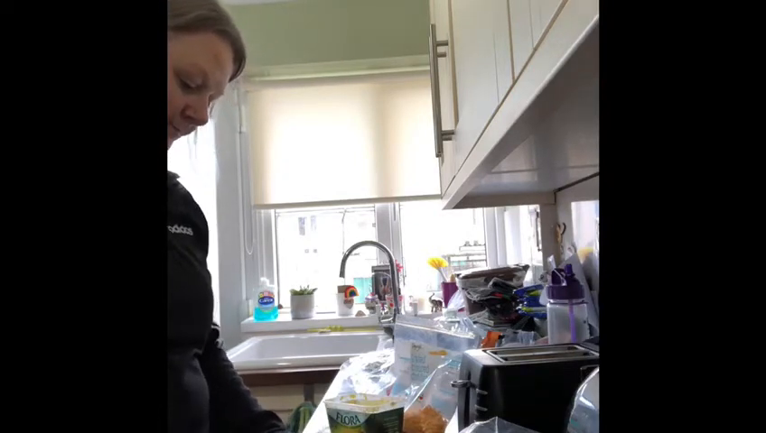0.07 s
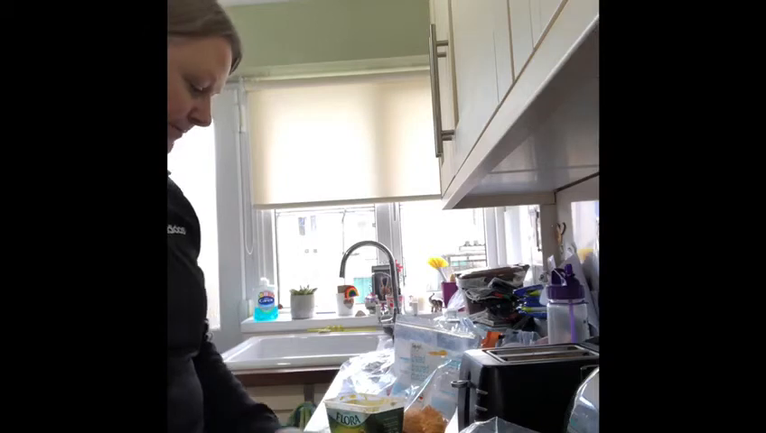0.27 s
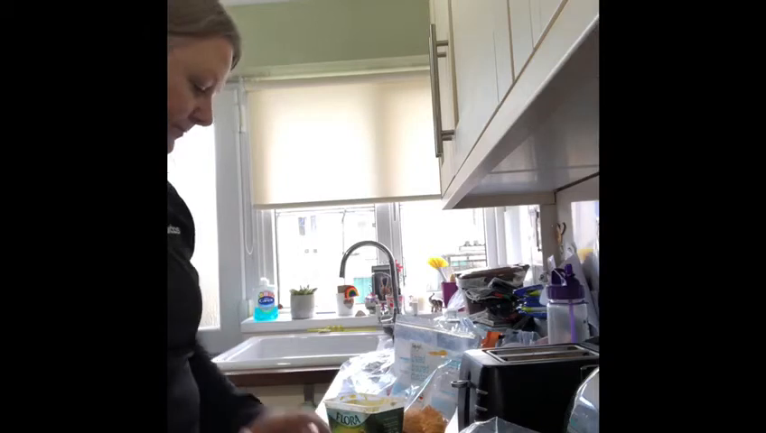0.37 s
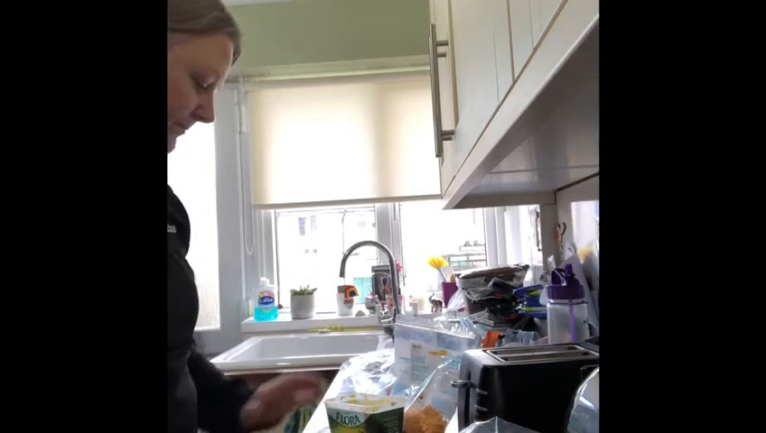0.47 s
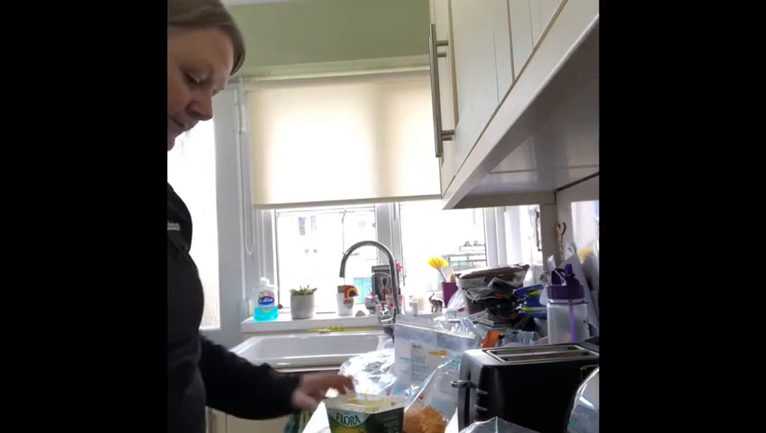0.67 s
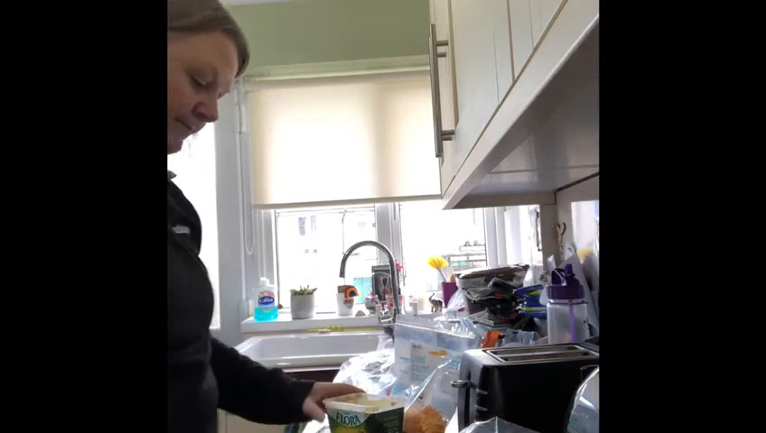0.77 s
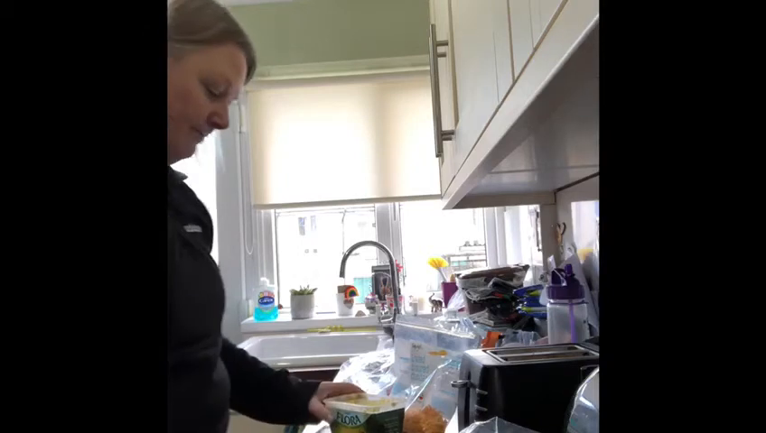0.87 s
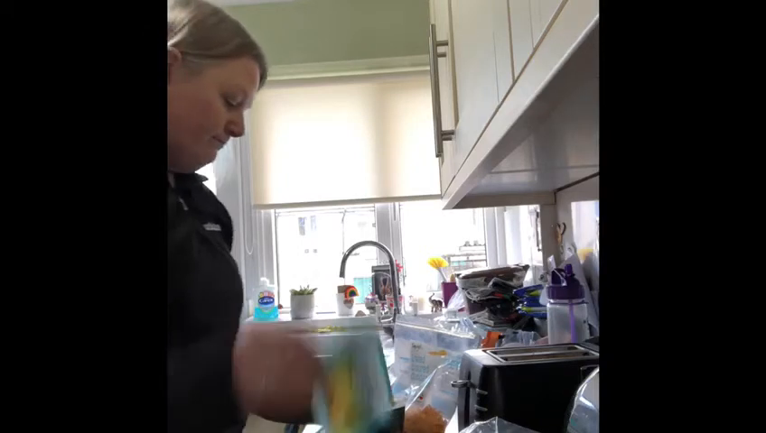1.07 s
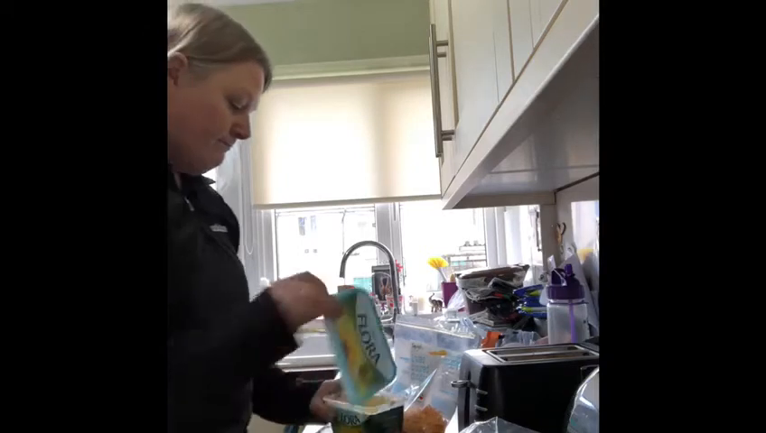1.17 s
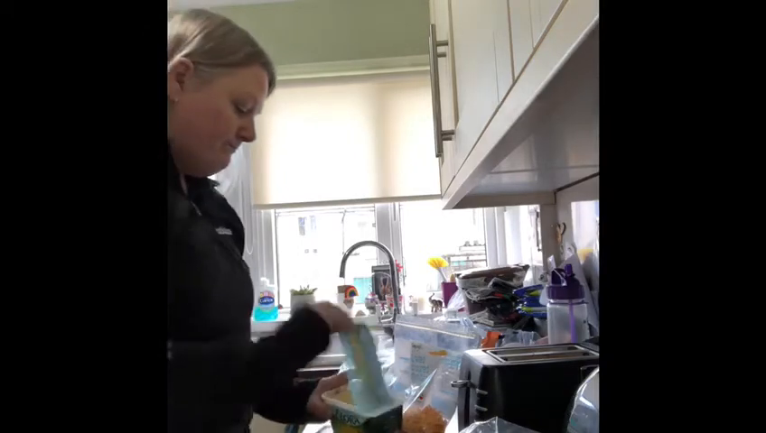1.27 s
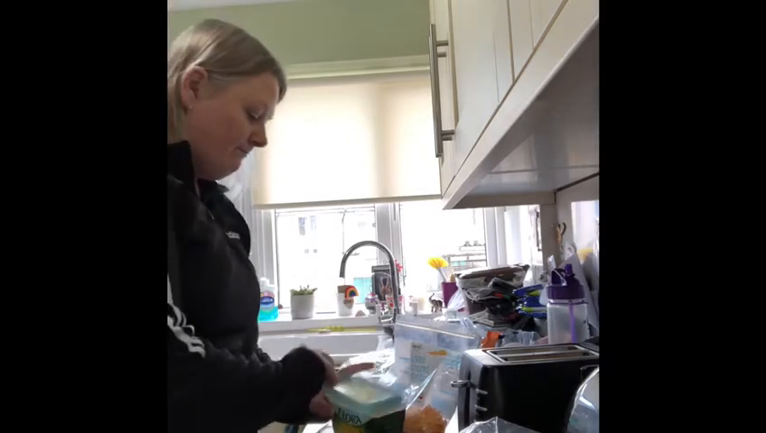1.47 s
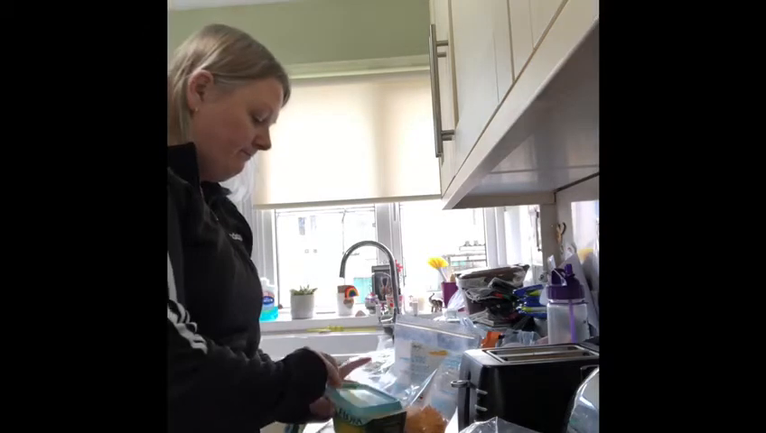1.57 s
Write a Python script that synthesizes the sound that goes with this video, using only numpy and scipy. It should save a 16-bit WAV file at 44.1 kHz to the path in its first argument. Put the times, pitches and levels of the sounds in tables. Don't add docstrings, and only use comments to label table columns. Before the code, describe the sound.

A steel knife clatters onto a counter, then scrapes dry toast, with one sharp plastic knock

```python
import sys
import numpy as np
from scipy import signal
from scipy.fft import rfft, irfft
from scipy.io import wavfile
from scipy.ndimage import uniform_filter1d

SR = 44100
rng = np.random.default_rng(int(sys.argv[2]) if len(sys.argv) > 2 else 0)


def volts_from_db(level):
    exponent = np.asarray(level, float) / 20
    return 10 ** exponent


def dump(signal):
    limited = np.clip(np.atleast_2d(signal).T, -1, 1)
    pcm = np.round(limited * 32767).astype(np.int16)
    wavfile.write(sys.argv[1], SR, pcm)


N = 74970
TIME_S = np.arange(N) / SR
BODY, CRUMBS = 3, 4


def unit(x):
    return x / np.sqrt(np.mean(x ** 2))


def colour(x, points):
    hz, db = np.array(points).T
    size = 4096
    bins_hz = np.arange(size // 2 + 1) * SR / size
    log_gain = np.interp(np.log(bins_hz + 1), np.log(hz), db) * np.log(10) / 20
    cepstrum = irfft(log_gain)
    folded = np.concatenate([cepstrum[:1], 2 * cepstrum[1:size // 2], np.zeros(size // 2)])
    impulse = irfft(np.exp(rfft(folded)))[:size // 2]
    return signal.fftconvolve(x, impulse)[:N]


def hit(start_s):
    return (np.arange(N) == int(start_s * SR)) * 1.0


def ring(x, hz, t60_s):
    pole = np.exp(2j * np.pi * hz / SR - np.log(1000) / (t60_s * SR))
    return signal.lfilter([1], [1, -pole], x).imag


def band(x, hz, width_hz):
    return signal.lfilter(*signal.iirpeak(hz, hz / width_hz, SR), x)


def sliding(x, hz, width_hz):
    turn = np.exp(2j * np.pi * np.cumsum(hz) / SR)
    keep = np.exp(-np.pi * width_hz / SR)
    return 2 * (turn * signal.lfilter([1 - keep], [1, -keep], x / turn)).real


def walk(rate_hz):
    k = int(SR / rate_hz)
    return unit(uniform_filter1d(uniform_filter1d(rng.standard_normal(N), k), k))


def grit(grain_db, grain_s):
    k = max(int(grain_s * SR), 1)
    grain_gain = volts_from_db(grain_db * rng.exponential(size=N)[:N // k + 1])
    size = np.repeat(grain_gain, k)[:N]
    return unit(uniform_filter1d(size, k) * rng.standard_normal(N))


def pressure(curve):
    time_s, level_db = np.array(curve).T
    return volts_from_db(np.interp(TIME_S, time_s, level_db, left=-200, right=-200))


def contacts(rows, column):
    push = np.zeros(N)
    for row in rows:
        peak_s, rise_s, fall_s = row[:3]
        slope_s = np.where(TIME_S < peak_s, rise_s, fall_s)
        push += volts_from_db(row[column]) * np.exp(-np.abs(TIME_S - peak_s) / slope_s)
    return push


def scrape(push, points, peaks, grain_db, grain_s, peak_db, bend=1.0):
    travel = np.interp(TIME_S, (0.87, 1.13), [0, 1])
    tracks = []
    for hz, width_hz, db, *end_hz in peaks:
        slide_hz = end_hz[0] - hz if end_hz else 0
        patchy_db = 3.5 * walk(25)
        tracks.append((bend * (hz + travel * slide_hz), width_hz, volts_from_db(peak_db + db + patchy_db)))

    def body(x):
        y = colour(x, points)
        return y + sum(gain * sliding(y, hz, width_hz) for hz, width_hz, gain in tracks)

    x = grit(grain_db, grain_s)
    steady_rms = np.sqrt(np.mean(body(x) ** 2))
    return body(x * push) / steady_rms


# pitch_hz, density_db (per Hz)
HUM_COLOUR = [(15, -21), (25, -17.5), (246, -6.5), (288, -9.5), (697, -13), (1640, -21.5), (1970, -19.5),
              (2130, -19.5), (12500, -33), (16200, -69), (22000, -120)]


def hum():
    fading = volts_from_db(-66.5 - 60 * TIME_S / 0.22)
    return unit(colour(rng.standard_normal(N), HUM_COLOUR)) * (volts_from_db(-67.5) + fading)


# start_s, level_db, pitch_hz
CLINKS = [
    (0, -74.5, 6000),
    (.158, -72, 1920),
    (0.158, -72.5, 3020),
]


def clinks():
    t60_s = 0.27
    return sum(volts_from_db(db) * ring(hit(s), hz, t60_s) for s, db, hz in CLINKS)


# pitch_hz, level_db, t60_s
KNIFE_MODES = [(424.3, -8.5, 0.1), (952, -6, 0.13), (1457, -11.5, 0.096), (2027, -9, 0.045),
               (2407, 0.5, 0.045), (3103, 0.5, 0.11), (4076, 2, 0.055), (4470, -2.5, 0.23),
               (5984, -0.5, 0.2), (7120, -5.5, 0.13), (7610, -4.5, 0.24), (8580, -12.5, 0.22),
               (9390, -7.5, 0.16), (11410, -5.5, 0.082)]
# start_s, level_db, chatter_s
BOUNCES = [
    (0.237, -30.5, 0.03),
    (0.2482, -3, 0.0058),
    (0.2546, -11.5, 0.0057),
    (0.262, -10, 0.0052),
    (0.2658, -9.5, 0.0042),
    (0.2727, -12, 0.0048),
    (0.2766, -12.5, 0.0048),
    (.284, -17, 0.011),
    (0.298, -25.5, 0.028),
]
# pitch_hz, density_db (per Hz)
COUNTER_COLOUR = [(24, -52), (40, -10.5), (412, -8.5), (576, -5), (932, -3), (2750, -6.5), (3100, -3.5),
                  (9150, -17), (12500, -25), (16200, -51), (22000, -120)]


def knife():
    push = sum(volts_from_db(db) * (TIME_S >= s) * np.exp(-np.abs(TIME_S - s) / chatter_s)
               for s, db, chatter_s in BOUNCES)
    landing_s = BOUNCES[1][0]
    strike = grit(1.6, 0.0005) * push * (TIME_S >= landing_s)
    lying = np.clip((TIME_S - 0.298) / 0.0012, 0, 1)
    twin_split, twin_db = 0.012, -5
    blade = np.zeros(N)
    for hz, db, t60_s in KNIFE_MODES:
        flutter_db = 4.5 * walk(90)
        pair = ring(strike, hz, t60_s) + volts_from_db(twin_db) * ring(strike, hz * (1 + twin_split), t60_s)
        blade += volts_from_db(db + lying * (-7.5 + flutter_db)) * pair
    counter = scrape(push, COUNTER_COLOUR, [], 0.77, 0.00077, 0)
    return blade * volts_from_db(-43), counter * volts_from_db(-15)


# time_s, level_db
BRUSH = [
    (.615, -76),
    (.642, -55.5),
    (.71, -73.5),
]
# pitch_hz, density_db (per Hz)
BRUSH_COLOUR = [(180, -39), (300, -14), (1050, -11), (4000, -12), (10900, -23), (12500, -43), (16200, -44),
                (22000, -120)]


def brush():
    return scrape(pressure(BRUSH), BRUSH_COLOUR, [], 1.7, 0.001, 0)


# start_s, crack_db, ring_hz, ring_db
TICKS = [(0.7144, -40, 2950, -60), (0.725, -42, 2470, -64), (0.7336, -25, 1392, -28),
         (0.745, -28, 2200, -37), (0.7627, -40, 1510, -47), (0.7775, -31, 2140, -36),
         (0.7904, -36, 1250, -49), (0.8045, -24.5, 1303, -29.5), (.8203, -38, 2130, -35),
         (1.2249, -24.5, 3810, -26.5), (1.241, -17.5, 4815, -26), (1.3135, -50, 1030, -37.5),
         (1.3623, -43.5, 1270, -38.5), (1.4148, -56, 4790, -34.5), (1.4381, -44, 1710, -39.5),
         (1.4445, -45, 920, -40), (1.6574, -29.5, 1230, -41)]
# start_s, level_db, pitch_hz
THUDS = [
    (0.716, -43.5, 205),
    (0.743, -48, 159),
    (0.784, -46, 166),
    (1.229, -55, 146),
    (1.33, -52, 109),
    (1.369, -45.5, 159),
]


def ticks():
    crack_s, ring_t60_s, thud_t60_s = 0.00081, 0.025, 0.096
    noise = rng.standard_normal(N)
    cracks, rings = np.zeros(N), np.zeros(N)
    for s, crack_db, hz, ring_db in TICKS:
        burst = noise * (TIME_S >= s) * np.exp(-np.abs(TIME_S - s) / crack_s)
        cracks += volts_from_db(crack_db) * (2 * hit(s) + burst)
        rings += volts_from_db(ring_db) * ring(hit(s), hz, ring_t60_s)
    for s, db, hz in THUDS:
        rings += volts_from_db(db) * band(ring(hit(s), hz, thud_t60_s), hz, 150)
    return rings, volts_from_db(-1) * band(cracks, 5500, 6300)


# peak_s, rise_s, fall_s, body_db, crumb_db
RATTLE = [
    (.718, 0.0029, 0.0071, -53, -62),
    (.735, 0.0022, 0.004, -30.5, -44),
    (.746, 0.0053, 0.023, -42, -55),
    (.762, 0.0047, 0.048, -48.5, -54),
    (.779, 0.0042, 0.0089, -59, -58),
    (.806, 0.0045, 0.0066, -39, -45),
    (.821, 0.000977, 0.061, -62, -51.5),
]
# pitch_hz, density_db (per Hz)
RATTLE_COLOUR = [(24, -28), (40, 1), (85, -6), (176, -2), (248, -7.5), (426, -11), (1150, -6),
                 (3000, -14.5), (3900, -31), (6600, -120)]
# pitch_hz, width_hz, level_db
RATTLE_PEAKS = [(1245, 77, -1), (1460, 130, -1.1), (2080, 220, 0.29)]


def rattle():
    return volts_from_db(-2.5) * scrape(contacts(RATTLE, BODY), RATTLE_COLOUR, RATTLE_PEAKS, 2.0, 0.0017, 7.3)


# peak_s, rise_s, fall_s, body_db, crumb_db
SHORT = [(1.352, 0.003585, 0.011, -73, -52), (1.363, 0.0005, 0.013, -47.5, -49),
         (1.39, 0.024, 0.0095, -47, -68.5), (1.416, 0.008, 0.0051, -48.5, -42.5),
         (1.424, 0.0032, .006, -43, -51), (1.439, 0.00051, 0.02, -41, -45.5),
         (1.475, 0.014, 0.019, -50.5, -57.5), (1.527, 0.0013, .008, -51, -55.5),
         (1.539, 0.0073, 0.012, -41, -56.5), (1.558, 0.0055, 0.0053, -45.5, -43),
         (1.565, 0.0033, 0.0063, -38.5, -47), (1.576, 0.0038, 0.013, -43.5, -46.5),
         (1.615, 0.026, 0.031, -46.5, -60), (1.652, 0.0046, .004, -49, -51.5),
         (1.658, 0.0014, 0.0079, -55, -41.5)]
# pitch_hz, density_db (per Hz)
CRUMB_COLOUR = [(1060, 6), (1800, 15), (3390, 16), (4690, 14), (5690, 15), (10800, 7), (12500, -27),
                (16200, -83), (22000, -120)]
# pitch_hz, width_hz, level_db
CRUMB_PEAKS = [(3890, 210, -13), (4710, 530, -9), (5740, 1100, -10.5)]


def crumbs():
    broken = scrape(contacts(RATTLE, CRUMBS), CRUMB_COLOUR, [], 1.1, 0.0013, 0)
    ground = scrape(contacts(SHORT, CRUMBS), CRUMB_COLOUR, CRUMB_PEAKS, 1.8, 0.0008, 9.5)
    return broken + ground


# time_s, level_db
STROKE = [
    (.82, -83),
    (.87, -51),
    (.93, -46.5),
    (1.0, -43.5),
    (1.06, -45),
    (1.11, -50.5),
    (1.16, -57.5),
    (1.21, -85),
    (1.23, -68),
]
# pitch_hz, density_db (per Hz)
STROKE_COLOUR = [(120, -11), (300, -12), (1200, -6.5), (5350, -5.5), (9700, -8.5), (10200, -21),
                 (10900, -16), (11500, -23)]
# start_hz, width_hz, level_db, end_hz
STROKE_PEAKS = [(371, 74, 7, 540), (1160, 60, 4.5, 1233), (2290, 70, -2, 2410), (3000, 75, 0, 3050),
                (3600, 120, 2.5, 3500), (3860, 110, 0, 3950), (4450, 270, 0, 4880), (5150, 300, 0, 5480),
                (7300, 64, -4, 7650), (8470, 81, -13.5, 8420), (9750, 92, -6, 16000)]


def long_stroke():
    return scrape(pressure(STROKE), STROKE_COLOUR, STROKE_PEAKS, 0.98, 0.00047, 9)


# peak_s, rise_s, fall_s, body_db, crumb_db
KNOCK = [
    (1.2245, 0.00041, 0.013, -30.5, -29),
    (1.232, 0.0019, 0.0093, -38.5, -35),
    (1.2425, 0.0011, 0.0038, -71, -24),
    (1.25, 0.0038, 0.033, -58.5, -43.5),
    (1.314, 0.00081, 0.0079, -49, -48.5),
    (1.333, 0.005, 0.018, -58, -70),
]
# pitch_hz, density_db (per Hz)
KNOCK_COLOUR = [(40, -39), (130, 1.5), (530, -2), (1300, -6.5), (1820, -8), (2300, -14), (5000, -56)]
# pitch_hz, width_hz, level_db
KNOCK_PEAKS = [(533, 14, 0), (1790, 130, -0.8)]
# pitch_hz, width_hz, level_db
KNOCK_BRIGHT = [(3650, 770, -8.5), (4500, 560, 16), (5630, 950, 14.5), (7300, 1230, 5.5)]


def knock():
    hollow = scrape(contacts(KNOCK, BODY), KNOCK_COLOUR, KNOCK_PEAKS, 2.0, 0.001, 8.5)
    bright = scrape(contacts(KNOCK, CRUMBS), CRUMB_COLOUR, KNOCK_BRIGHT, 1.3, 0.00092, 21)
    return hollow * volts_from_db(-5.5) + bright * volts_from_db(-4.5)


# pitch_hz, density_db (per Hz)
TUB_COLOUR = [(29, -100), (90, -21), (400, -6), (721, -6), (952, 1), (1410, -13), (2500, -23), (3250, -27),
              (5500, -82)]
# pitch_hz, width_hz, level_db
TUB_PEAKS = [(525, 40, 0), (690, 60, 0.5), (934, 140, -4), (1211, 55, -5.5), (1750, 120, -1.5),
             (2920, 300, 6)]
# time_s, pitch_factor
FLEX = [
    (1.35, 1.12),
    (1.40, 0.92),
    (1.44, 1.13),
    (1.48, .97),
    (1.53, 0.99),
    (1.58, 0.947),
    (1.63, .97),
    (1.68, 0.94),
]


def tub_rub():
    bend = np.interp(TIME_S, *np.array(FLEX).T)
    return scrape(contacts(SHORT, BODY), TUB_COLOUR, TUB_PEAKS, 2.0, 0.0015, 4.9, bend=bend)


def room(x):
    t = np.arange(SR) / SR
    noise = rng.standard_normal(len(t))
    low = signal.lfilter(*signal.butter(1, 2060, fs=SR), noise)
    low_decay = volts_from_db(-60 * t / 0.36)
    high_decay = volts_from_db(-60 * t / 0.13) + volts_from_db(-15 - 60 * t / 0.66)
    tail = low * low_decay + (noise - low) * high_decay
    tail = tail * (t > 0.004)
    return signal.fftconvolve(x, tail / np.sqrt(np.sum(tail ** 2)))[:N] * volts_from_db(-8.5)


def scene():
    blade, counter = knife()
    rings, cracks = ticks()
    rubbing = brush() + long_stroke() + rattle() + knock() + tub_rub() + crumbs()
    noisy = counter + cracks + rubbing
    ringing = blade + rings + clinks()
    echoes = room(noisy + volts_from_db(-14) * ringing)
    return (noisy + ringing + echoes + hum())[None]


def roll_off(x):
    return signal.sosfilt(signal.butter(12, 12750, fs=SR, output="sos"), x)


def record(dry):
    x = signal.sosfilt(signal.butter(2, 59.7, "high", fs=SR, output="sos"), dry)
    x = x - 0.49 * band(x, 10140, 440)
    x = signal.sosfilt(signal.cheby1(10, 0.5, 12000, fs=SR, output="sos"), x)
    return roll_off(x)


dry = scene()
out = record(dry)
dump(out)
```